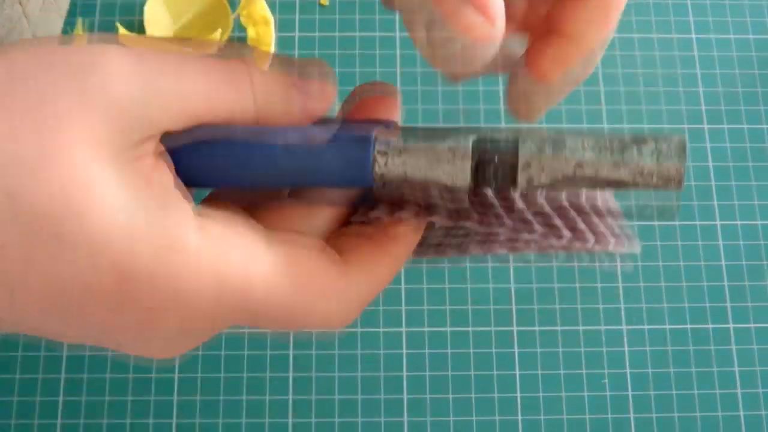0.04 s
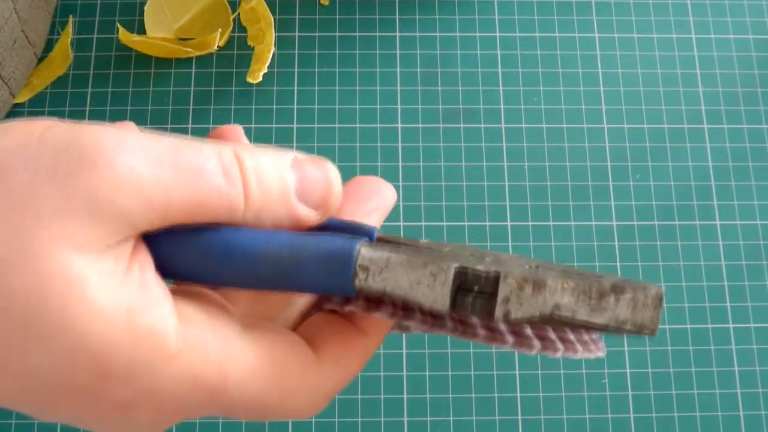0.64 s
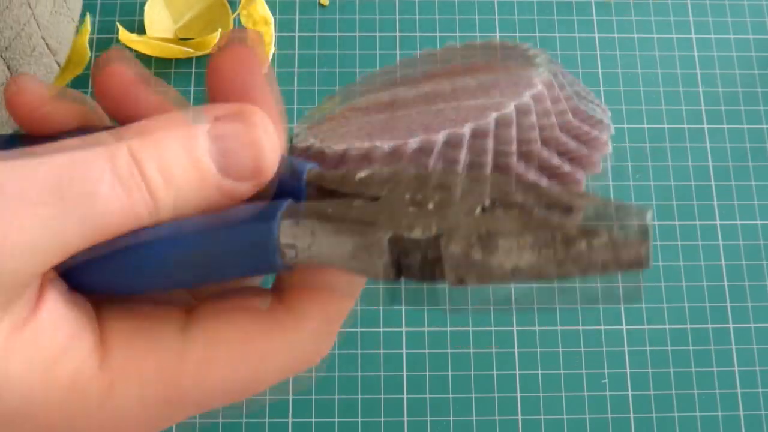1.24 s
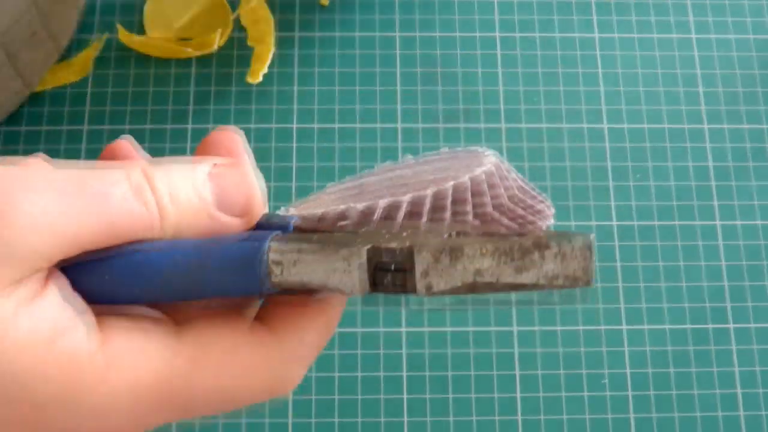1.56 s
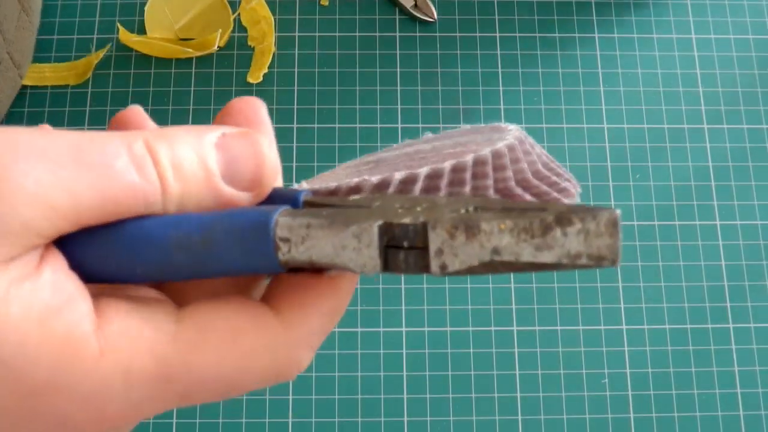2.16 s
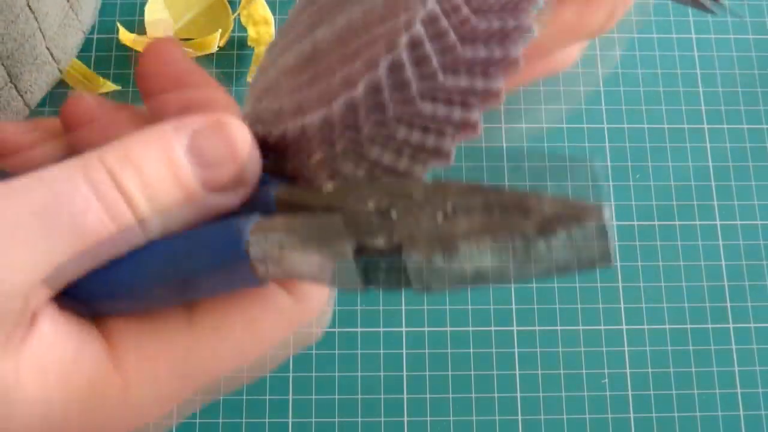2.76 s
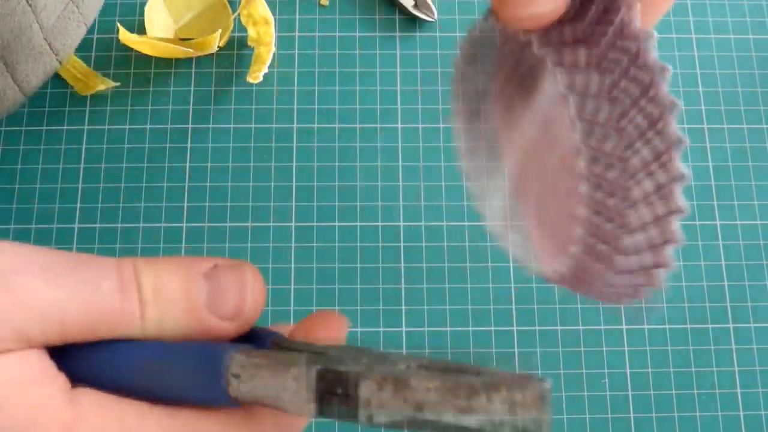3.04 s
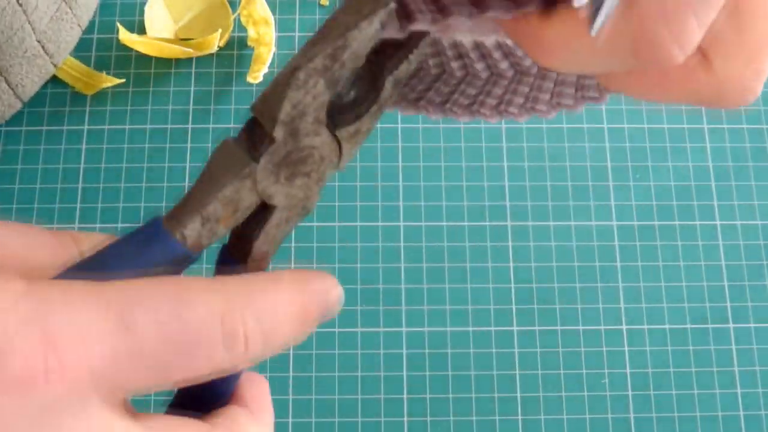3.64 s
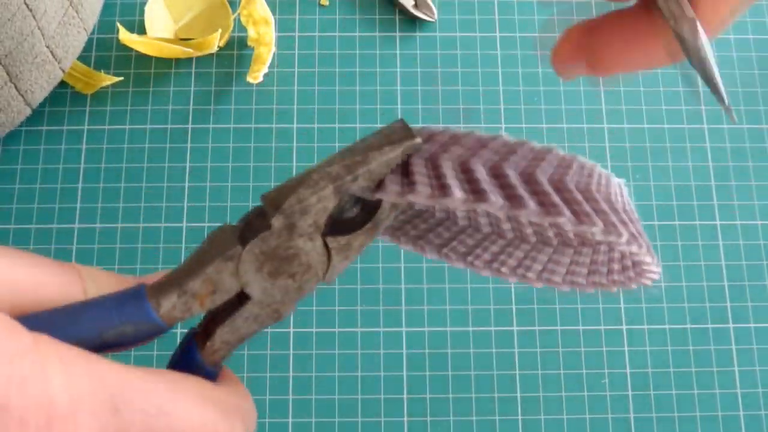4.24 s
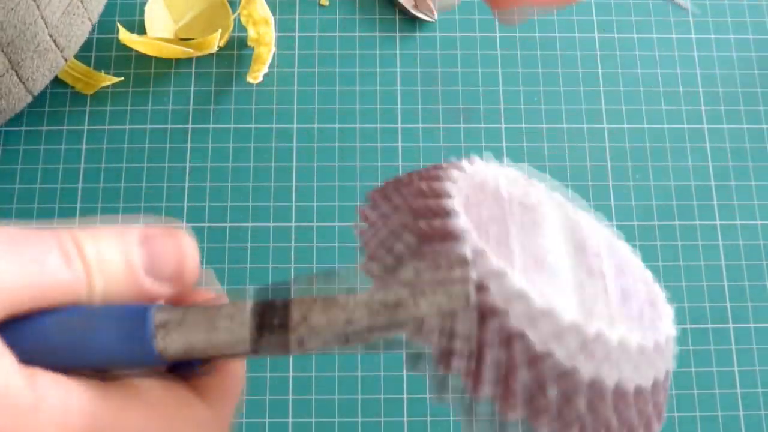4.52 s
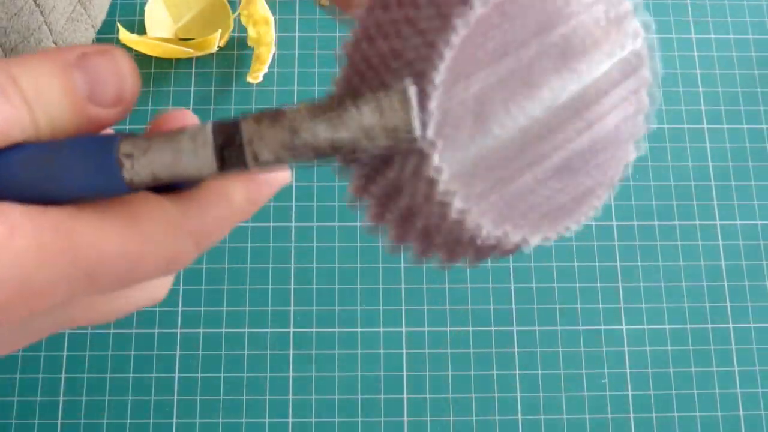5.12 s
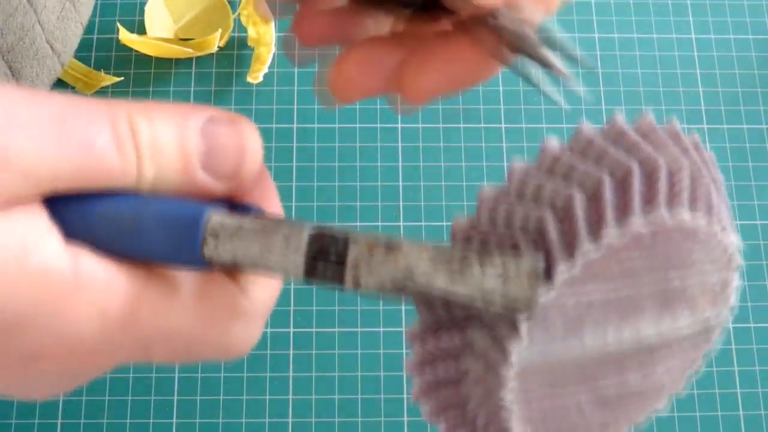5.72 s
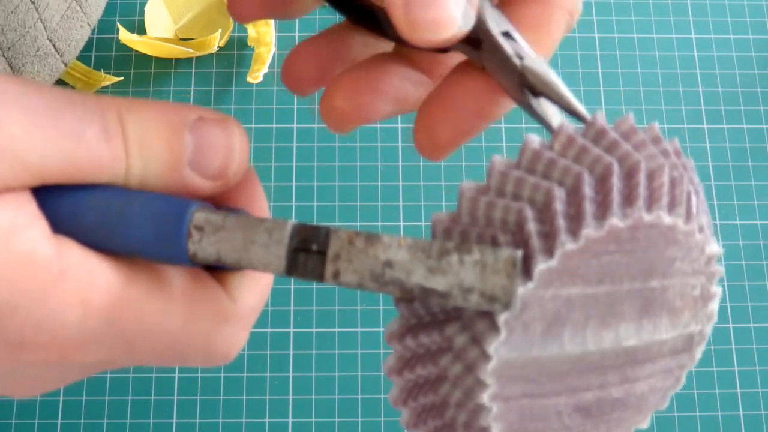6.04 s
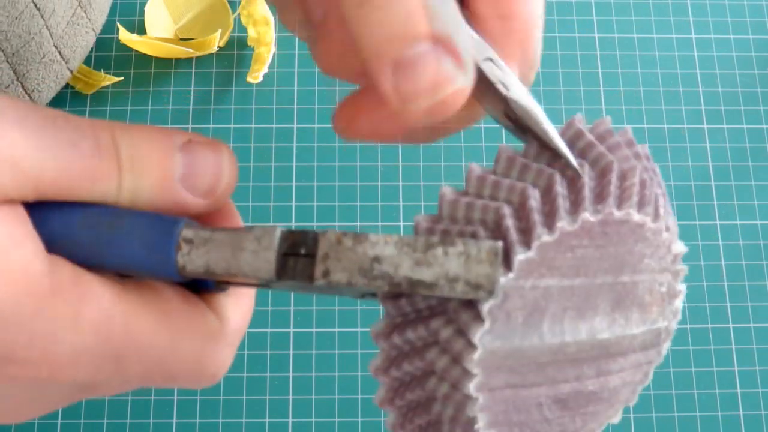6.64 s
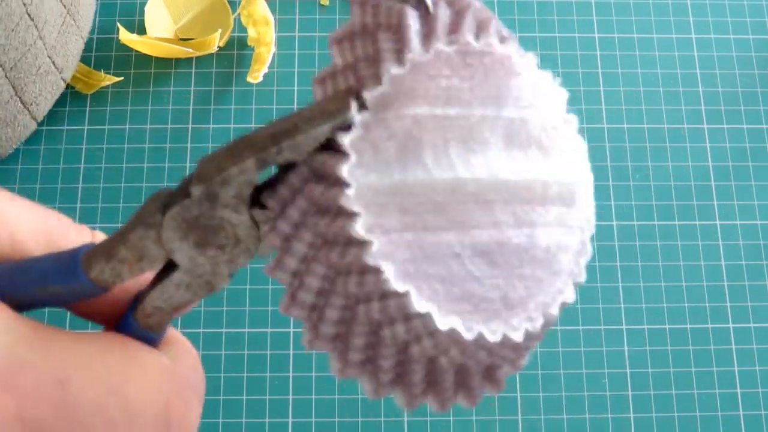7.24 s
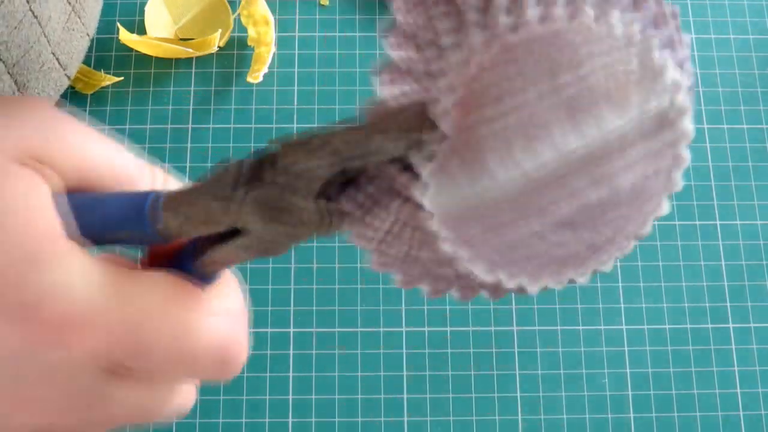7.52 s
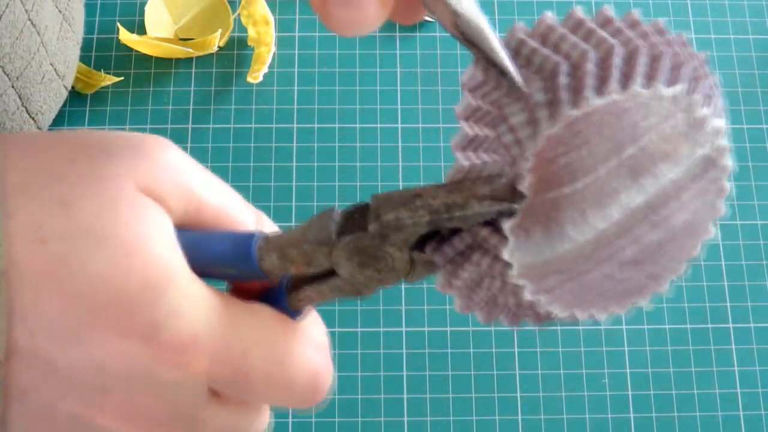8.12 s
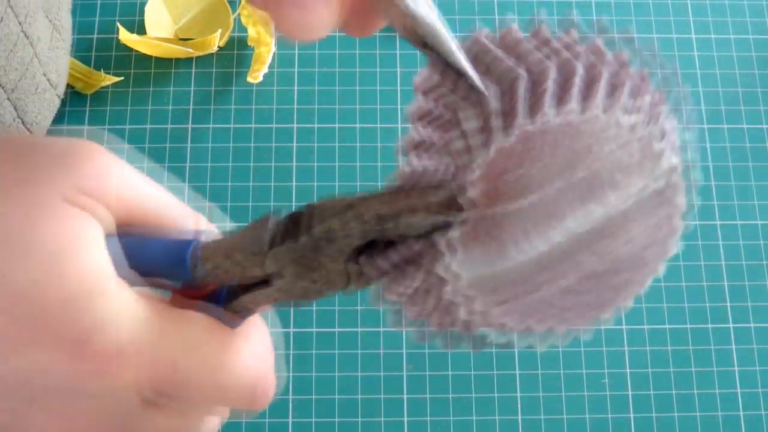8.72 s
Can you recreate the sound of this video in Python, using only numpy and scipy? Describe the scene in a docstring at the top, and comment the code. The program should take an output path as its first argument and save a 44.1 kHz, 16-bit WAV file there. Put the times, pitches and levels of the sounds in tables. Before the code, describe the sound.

Pliers handle a thin pleated plastic pot close to the microphone. First come soft rubs, booming desk bumps and one loud hollow knock, then lighter taps and scrapes. The pot crumples briefly, and after more rubbing the plastic strains and rips with dry ticks and crisp cracks. Behind it a small room hums quietly with a faint rapid tick, dipping briefly after the loudest blows.

```python
"""Pliers grip and twist a thin pleated plastic pot over a desk in a small room.
First the hand bumps the desk, which booms and thuds; jaws and fingers knock and rub the hollow pot.
Near 5 s the pot buckles and crinkles. A low hum swells from 6.4 s and stops at 7.5 s.
From 6.6 s the stretched wall ticks and tears in sharp snaps. Throughout: low room noise, a steady hum
and a faint, quick ticking, all dipping briefly after the loudest blows."""
import sys
import numpy as np
from scipy import signal
from scipy.fft import rfft, irfft, next_fast_len
from scipy.io import wavfile

SR = 44100
rng = np.random.default_rng(int(sys.argv[2]) if len(sys.argv) > 2 else 0)


def unload_wav(signal):
    """Save mono or channel-first audio to the path in sys.argv[1] as 16-bit WAV at rate SR, clipped to [-1, 1]."""
    wavfile.write(
        sys.argv[1],
        SR,
        np.round(np.clip(np.atleast_2d(signal).T, -1, 1) * 32767).astype(np.int16),
    )


N = 386757

# Jaws and fingers knock or buckle the pot. Each row: start in seconds, body, wall and crack levels in dB.
POT_KNOCKS = [(0.0389, -41.5, -52, -44), (0.0606, -61, -63, -52.5), (0.4593, -40, -57, -66),
              (0.5269, -58, -60, -61), (0.8476, -65, -57.5, -61.5), (1.631, -59, -42, -54),
              (1.826, -11, -30, -36.5), (2.2515, -48.5, -55, -58), (2.2724, -37, -54, -59),
              (2.541, -40, -46.5, -50.5), (2.64, -44.5, -57.5, -53.5), (2.6989, -44, -52, -65),
              (2.805, -41, -48, -67), (3.3447, -74, -60, -62), (3.3663, -46.5, -41, -47),
              (3.37, -56, -42.5, -44.5), (3.6054, -47, -46.5, -51.5), (3.655, -40, -49.5, -67),
              (3.7722, -49, -52, -60), (4.941, -39.5, -54.5, -56), (5.015, -26.5, -34.5, -33.5),
              (5.0213, -23.5, -39.5, -59.5), (5.0754, -24.5, -31.5, -29), (5.1236, -38, -36, -40),
              (5.1505, -54, -39.5, -52), (5.2696, -41, -40.5, -44.5), (5.364, -38.5, -47, -44.5),
              (5.9103, -40, -43, -54), (5.9393, -41.5, -51, -72), (6.073, -53, -49.5, -60),
              (6.3676, -39.5, -44.5, -69), (6.4288, -59, -51, -60), (6.4442, -41.5, -46.5, -73)]
# Crisp, bright ticks and snaps of the wall, tearing from 6.6 s.
# Each row: start in seconds, crack level in dB, brightness in dB, body level in dB.
CRISP_SNAPS = [(0.579, -55, 1, -66), (0.62, -58, 1, -60), (0.9981, -48, 7, -67), (1.77, -58, 4, -62),
               (3.0363, -54.5, 0.5, -71), (6.6532, -44.5, -0.5, -47.5), (6.6982, -47.5, 4, -50),
               (6.7086, -30.5, 2.5, -50), (6.8581, -40.5, -0.5, -68), (6.941, -54.5, 2, -66),
               (6.9865, -48.5, -1, -70), (7.03, -43.5, 7, -49), (7.044, -51, 4.5, -69),
               (7.0693, -46, 4.5, -70), (7.1158, -53.5, 1.5, -68.5), (7.213, -54, 4.5, -63.5),
               (7.2304, -41, 10.5, -50), (7.2363, -40.5, -7, -39.5), (7.2921, -49, 2, -63),
               (7.364, -53.5, -0.5, -61.5), (7.3876, -48, 5, -59), (7.3945, -44.5, 1.5, -72),
               (7.404, -36.5, 2, -56), (7.4309, -38.5, -4, -66.5), (7.4393, -50.5, 3.5, -68.5),
               (7.465, -22, -1.5, -60), (7.4868, -52, 2.5, -67.5), (7.5665, -51.5, 1.5, -61.5),
               (7.63, -56.5, -1.5, -80), (8.0118, -59, 8.5, -80), (8.0573, -27.5, 1, -40),
               (8.114, -50.5, 2.5, -56.5), (8.3465, -66, -1, -80), (8.378, -59.5, 6, -74),
               (8.4295, -39.5, -4, -42.5), (8.4348, -36.5, 2.5, -51), (8.6574, -58.5, 12, -86)]
# Radiation of the thin wall. Each row: frequency in Hz, gain in dB.
WALL_RADIATION = [(300, -26.5), (620, -3), (940, 12), (1300, 8.5), (1800, 12.5), (2900, 10.5), (3900, 3),
                  (5700, 9.5), (7400, 10), (10000, 0.5), (15500, 0)]
# Resonances of the pot's body. Each row: frequency in Hz, width in Hz, gain in dB.
POT_MODES = [(303, 100, -3), (442.6, 43.2, 2.5), (600, 130, -10)]
# Ticking of the stretched wall. Each row: start and stop in seconds, ticks per second, base level in dB.
STRAIN_SPELLS = [(5.007, 5.168, 110, -80), (6.654, 6.711, 70, -57.5), (6.858, 7.159, 90, -63),
                 (7.22, 7.311, 140, -57), (7.359, 7.457, 89, -55), (7.496, 8.702, 24, -73)]
# Fingers and jaws slide on the pot. Each row: middle and length in seconds, body and scrape levels in dB.
SLIDE_STROKES = [(0.016, 0.43, -41, -61), (0.596, 0.34, -47, -67), (0.727, 0.53, -48, -68.5),
                 (1.126, 0.48, -52, -66), (1.796, 0.42, -33.5, -63), (2.692, 0.29, -41.5, -65.5),
                 (2.88, 0.1, -44, -55), (3.13, 1, -59.5, -72), (3.25, 0.06, -77, -68),
                 (3.7, 0.49, -50.5, -66), (3.987, 0.086, -51, -57), (4.705, .2, -54, -79),
                 (4.846, 0.083, -48, -61.5), (5.038, 0.14, -32, -54.5), (5.126, 0.072, -36.5, -47.5),
                 (5.183, 0.082, -33.5, -64), (5.256, 0.05, -40.5, -54.5), (5.486, 0.24, -50, -66.5),
                 (6.02, 0.036, -44, -67), (6.063, 0.044, -40, -57), (6.38, 0.054, -39.5, -56),
                 (6.437, 0.066, -39.5, -56), (6.634, 0.5, -54.5, -71.5), (7.27, .1, -66, -67)]
# Spectra of the scraped wall and crinkling pleats. Each row: frequency in Hz, relative density in dB.
SCRAPE_SPECTRUM = [(450, -26.5), (750, 4.5), (1300, 2.5), (2000, 2.5), (2700, -1.5), (3600, -13.5),
                   (5500, -34)]
CRINKLE_SPECTRUM = [(2500, -24), (3500, -2.5), (5500, -2.5), (7300, 2.5), (9000, -11.5), (11000, -15),
                    (16000, -30)]
# The hand bumps the desk. Each row: start in seconds, relative boom and thud levels in dB.
DESK_BUMPS = [(0.46, -30.5, -33), (0.565, -31.5, -37.5), (0.698, -22.5, -33.5), (0.871, -32.5, -49),
              (1.629, -23, -31), (1.737, -20.5, -19.5), (1.834, -20, -19), (1.868, -34, -22.5),
              (2.197, -43, -49.5), (2.286, -22, -38.5)]
# Resonances of the desk. Each row: frequency in Hz, width in Hz, gain in dB.
DESK_MODES = [(189, 12, 5), (264.6, 10, 5.5), (346.5, 14, 1.5), (441, 18.3, 4), (611, 110, -15.5)]
# Decay of the room's tail. Each row: frequency in Hz, T60 in seconds.
ROOM_DECAY = [(150, 0.4), (7000, 0.31), (15000, 0.26)]
# Colour of the room's tail. Each row: frequency in Hz, gain in dB.
ROOM_COLOUR = [(500, -11), (2000, -9), (4000, -12.5), (7300, -9.5), (10500, -15.5), (16000, -12.5)]
# Swell of a low hum near 210 Hz. Each row: time in seconds, level in dB.
HUM_SWELL = [(6.4, -89), (6.75, -60.5), (7.43, -52), (7.5, -92)]
# Room noise. Each row: frequency in Hz, relative density in dB.
AIR_SPECTRUM = [(15, -37), (25, -6.5), (50, -0.5), (123, -3), (166, -2.5), (344, -7.5), (451, -11.5),
                (988, -26.5), (1290, -32.5), (2110, -35), (3340, -43.5), (7310, -41), (11600, -52.5),
                (16000, -42.5)]
# Steady hum. Each row: frequency in Hz, relative level in dB.
HUM_TONES = [(118.4, -59), (209.9, -63.5), (1599, -87)]
# Background ticks that stand out. Each row: start in seconds, relative level in dB.
CLEAR_TICKS = [(0.184, -49), (0.316, -49.5), (0.385, -50), (1.384, -54), (1.517, -55), (1.584, -56),
               (4.386, -52)]
# Resonances of a background tick. Each row: frequency in Hz, width in Hz, gain in dB.
TICK_MODES = [(965, 70, -5), (1900, 28, -7.5), (2400, 200, -9)]
# Dips of the background. Each row: start in seconds, depth in dB.
BACKGROUND_DIPS = [(1.8, 8.5), (7.47, 13), (8.06, 5.5)]


def snaps():
    """Each snap cracks through the wall in its own colour and pops the pot's hollow body."""
    out, t = np.zeros((2, N)), np.arange(SR // 15) / SR
    pop = unit(band(np.sin(2 * np.pi * 350 * t) * decay(t, t60_s=.009), 170, 550))
    for start_s, body_db, wall_db, crack_db, top_db in snap_levels():
        push = fracture(t)
        flex_db = np.clip(.58 * (wall_db + 35), 0, 5)  # hard snaps flex the whole wall
        colour = [(950, wall_db + flex_db), (1300, wall_db), (2500, wall_db),
                  (4200, crack_db), (8200, crack_db), (10800, top_db)]
        # each pleat has its own resonances
        pleat = np.transpose([np.geomspace(700, 16000, 20), 1.6 * rng.standard_normal(20)])
        crack = minimum_phase(packed(push, .0031),
                              lambda hz: along(colour, hz) + along(WALL_RADIATION, hz) + along(pleat, hz))
        body = pop + .34 * unit(band(resonate(push.mean(0), POT_MODES), 150, 640))
        add(out, start_s, crack + amp(body_db) * packed(body, .0047))
    return out


def snap_levels(firm_db=-44, top_db_per_db=.65):
    """Start and band levels: harder knocks are brighter; brighter crisp snaps move the wall less."""
    knocks = [(start_s, body, wall, crack, crack - 20.5 + top_db_per_db * (max(body, crack) - firm_db))
              for start_s, body, wall, crack in POT_KNOCKS]
    crisp = [(start_s, body, crack - 5 - bright, crack, crack - 2 + bright)
             for start_s, crack, bright, body in CRISP_SNAPS]
    return knocks + crisp


def fracture(t, travel_s=.0005917, echo_gain=.16, echo_s=.00105):
    """A sharp release, a brief flutter of the sheet, and their reflection off the desk."""
    hz = np.fft.rfftfreq(len(t), 1 / SR)
    # dispersive bending waves: highs leave first, slightly differently per channel
    delay_1khz_s = travel_s * rng.uniform(.68, 1.315) * (1 + .039 * rng.standard_normal((2, 1)))
    chirp = irfft(np.exp(-4j * np.pi * delay_1khz_s * np.sqrt(1000 * hz)), len(t))
    release = packed(chirp * decay(t, t60_s=.03), 1)
    flutter = packed(stereo_noise(len(t), side_db=-13) * decay(t, t60_s=.016), .78)
    direct = release + amp(2.5) * flutter
    lag = round(SR * echo_s * rng.uniform(.88, 1.12))
    return direct + echo_gain * np.pad(direct, ((0, 0), (lag, 0)))[:, :len(t)]


def recoil(relative_db=-16.5):
    """Each crisp snap jerks the pot in the grip: one short, low push."""
    out, t = np.zeros((2, N)), np.arange(SR // 15) / SR
    push = packed(band(decay(t, t60_s=.01), 55, 190), .005)
    for start_s, crack_db, *_ in CRISP_SNAPS:
        add(out, start_s, amp(crack_db + relative_db) * push)
    return out


def strain():
    """The stretched wall gives way in tiny, dry ticks."""
    out, t = np.zeros((2, N)), np.arange(SR // 100) / SR
    for start_s, stop_s, rate_hz, base_db in STRAIN_SPELLS:
        length_s = stop_s - start_s
        count = max(1, round(rate_hz * length_s))
        for position, weakness, pitch in rng.random((count, 3)):
            burst = stereo_noise(len(t), side_db=-5) * decay(t, t60_s=.003)
            tick = packed(band(burst, 1200 * 3 ** pitch, 13000, order=1), .005)
            add(out, start_s + position * length_s, amp(base_db - 4 * np.log(weakness + .04)) * tick)
    return out


def rubbing():
    """Sliding contact hums in the pot's body, scrapes its wall and crinkles the pleats."""
    body_gain, scrape_gain = stroke_gains()
    body = unit(band(resonate(friction(side_db=-17.5), POT_MODES), 200, 920))
    scrape = coloured(friction(side_db=-3.5), SCRAPE_SPECTRUM)
    crinkle = coloured(friction(side_db=.5), CRINKLE_SPECTRUM)
    return amp(-4.5) * body_gain * body + scrape_gain * (scrape + amp(-4) * crinkle)


def stroke_gains(grip_db=-80.5, edge_drop_db=16.5):
    """Body and scrape gains: each stroke swells and fades over the faint rub of the resting grip."""
    t = np.arange(0, N / SR, .002)
    body = scrape = amp(grip_db)
    for middle_s, length_s, body_db, scrape_db in SLIDE_STROKES:
        swell_db = -edge_drop_db * (2 * (t - middle_s) / length_s) ** 2
        body = np.hypot(body, amp(body_db + swell_db))
        scrape = np.hypot(scrape, amp(scrape_db + swell_db))
    return curves(np.transpose([t, body, scrape]))


def friction(side_db, slips_per_s=280, slip_decay_s=.0015):
    """Tiny slips of differing size merge into a grainy swish."""
    slips = (rng.random(N) < slips_per_s / SR) * amp(4 * np.minimum(rng.exponential(size=N), 3))
    envelope = signal.lfilter([1], [1, -np.exp(-1 / (slip_decay_s * SR))], slips)
    return stereo_noise(N, side_db) * (unit(envelope) + .65)


def desk_bumps(thud_t60_s=.17):
    """A bump shakes the desk's resonances, rattles faintly and sets two low modes booming."""
    out, t = np.zeros((2, N)), np.arange(3 * SR // 4) / SR
    span_s = thud_t60_s / 8
    for start_s, boom_db, thud_db in rebounds():
        chatter = rng.standard_normal(len(t)) * decay(t, thud_t60_s)
        ring = packed(band(resonate(chatter, DESK_MODES), 140, 668, order=4), span_s)
        knock = packed(band(chatter, 107, 478, order=4), span_s)
        rattle = packed(band(chatter, 600, 1610), span_s)
        thud = .46 * ring + .68 * knock + amp(-23.5) * rattle
        short_mode = np.sin(2 * np.pi * 94 * t) * decay(t, t60_s=.053)
        long_mode = np.sin(2 * np.pi * 127 * t + rng.uniform(0, 2 * np.pi)) * decay(t, t60_s=.36)
        attack = 1 - np.exp(-t / .0043)
        boom = band((short_mode + .42 * long_mode) * attack, 53, 230)
        add(out, start_s, amp(boom_db + 3.5) * boom + amp(thud_db) * thud)
    return out


def rebounds(hits=3, gap_s=.025, loss_db=6):
    """Start and levels of each bump and its weaker, unevenly timed rebounds."""
    all_gaps_s = gap_s * rng.uniform(.7, 1.3, (len(DESK_BUMPS), hits))
    return [(start_s + gaps_s[:k].sum(), boom_db - k * loss_db, thud_db - k * loss_db)
            for (start_s, boom_db, thud_db), gaps_s in zip(DESK_BUMPS, all_gaps_s) for k in range(hits)]


def snap_reverb(draws=2):
    """Smooth, diffuse room tail of the snaps, averaged over several random draws."""
    return sum(room(snaps()) for _ in range(draws)) / np.sqrt(draws)


def room(x, predelay_s=.004):
    """A diffuse tail whose treble dies first; it changes as the pot is moved about."""
    out, hop = np.zeros((2, N)), SR // 3
    for start in range(0, N, hop):
        hz, t, noise = signal.stft(stereo_noise(SR // 2, side_db=-5.5), SR, nperseg=256)
        t60_s = along(ROOM_DECAY, hz)[:, None]
        tail = signal.istft(noise * decay(t, t60_s) / np.sqrt(t60_s), SR, nperseg=256)[1]
        tail /= np.linalg.norm(tail[0])
        add(out, start / SR + predelay_s, signal.fftconvolve(x[:, start:start + hop], tail, axes=1))
    return filtered(out, lambda hz: amp(along(ROOM_COLOUR, hz)))


def hum_swell():
    """A low hum near 210 Hz swells from 6.4 s and stops at 7.5 s."""
    return amp(curves(HUM_SWELL)[0]) * unit(band(rng.standard_normal(N), 195, 230))


def background():
    """Low room noise, hum and ticking, dipping together."""
    t = np.arange(N) / SR
    air = coloured(stereo_noise(N, side_db=-8), AIR_SPECTRUM)
    hum = sum(amp(db) * np.sqrt(2) * np.sin(2 * np.pi * hz * t + rng.uniform(0, 2 * np.pi))
              for hz, db in HUM_TONES)
    return amp(background_gain_db()) * (amp(-52.5) * air + hum + ticking())


def ticking(rate_hz=15):
    """Faint ticks on a steady beat, as from a focus motor; a few stand out."""
    out, t = np.zeros((2, N)), np.arange(SR // 20) / SR
    beat = [(start_s, -71 + 3 * rng.normal()) for start_s in np.arange(.053, N / SR, 1 / rate_hz)]
    clear = [(start_s, db - 10) for start_s, db in CLEAR_TICKS]
    for start_s, db in beat + clear:
        step = rng.standard_normal(len(t)) * decay(t, t60_s=.028)
        tick = band(resonate(step, TICK_MODES), 700, 1800)
        add(out, start_s, amp(db) * packed(tick, .016))
    return out


def background_gain_db(rest_db=-1.5, attack_s=.03, hold_s=.35, recovery_db_per_s=27.5):
    """At each listed dip the level drops quickly, holds and creeps back."""
    t, gain_db = np.arange(N) / SR, rest_db
    for start_s, depth_db in BACKGROUND_DIPS:
        onset = np.clip((t - start_s) / attack_s, 0, 1)
        drop_db = np.clip(depth_db - recovery_db_per_s * (t - start_s - hold_s), 0, depth_db)
        gain_db = gain_db - onset * drop_db
    return gain_db


def amp(db):
    """Decibels to gain."""
    return 10 ** (np.asarray(db) / 20)


def decay(t, t60_s):
    """Envelope falling 60 dB in t60_s."""
    return amp(-60 * t / t60_s)


def unit(x):
    """Scale to rms 1."""
    return x / np.sqrt(np.mean(x ** 2) + 1e-20)


def packed(x, span_s):
    """Scale to the energy of rms 1 over span_s."""
    return unit(x) * np.sqrt(span_s * SR / x.shape[-1])


def along(points, hz):
    """Interpolate (Hz, value) points on a log axis."""
    points_hz, values = np.transpose(points)
    return np.interp(np.log(hz + 1), np.log(points_hz + 1), values)


def curves(rows):
    """One value per sample for each column after the time."""
    times_s, *columns = np.transpose(rows)
    return [np.interp(np.arange(N) / SR, times_s, column) for column in columns]


def filtered(x, response):
    """Apply a complex frequency response."""
    n = x.shape[-1]
    size = next_fast_len(n + 8192)
    return irfft(rfft(x, size) * response(np.fft.rfftfreq(size, 1 / SR)), size)[..., :n]


def coloured(x, spectrum):
    """Shape by (Hz, dB) points, at rms 1."""
    return unit(filtered(x, lambda hz: amp(along(spectrum, hz))))


def resonate(x, modes):
    """Parallel resonances of alternating sign."""
    return filtered(x, lambda hz: sum(
        (-1) ** k * amp(db) * 1j * hz * width_hz / (mode_hz ** 2 - hz ** 2 + 1j * hz * width_hz)
        for k, (mode_hz, width_hz, db) in enumerate(modes)))


def band(x, lo_hz, hi_hz, order=2):
    """Causal band-pass."""
    return signal.sosfilt(signal.butter(order, [lo_hz, hi_hz], "band", fs=SR, output="sos"), x)


def minimum_phase(x, gain_db):
    """Apply a gain curve of frequency, with nothing ahead of the attack."""
    n = 2 * x.shape[-1]
    gain = amp(np.maximum(gain_db(np.fft.rfftfreq(n, 1 / SR)), -120))
    cepstrum = irfft(np.log(gain), n)
    cepstrum[1:n // 2] *= 2
    cepstrum[n // 2 + 1:] = 0
    return irfft(rfft(x, n) * np.exp(rfft(cepstrum)), n)[..., :n // 2]


def stereo_noise(n, side_db):
    """White noise: a shared part plus an opposed part at side_db."""
    mid, side = rng.standard_normal((2, n))
    return unit(np.array([mid + amp(side_db) * side, mid - amp(side_db) * side]))


def add(track, start_s, sound):
    """Mix a sound into the track."""
    start = max(0, round(start_s * SR))
    part = track[:, start:start + sound.shape[-1]]
    part += sound[..., :part.shape[1]]


def scene():
    """Pot and desk in the room; the tail dips partly with the background."""
    direct = recoil() + desk_bumps() + strain() + hum_swell()
    tail = amp(.25 * background_gain_db()) * (snap_reverb() + room(direct))
    return snaps() + direct + tail + rubbing() + background()


def record(dry):
    """The camera's band limit: a steep low-pass."""
    cutoff_hz = 16300
    return filtered(dry, lambda hz: 1 / np.sqrt(1 + (hz / cutoff_hz) ** 120))


dry = scene()
out = record(dry)
unload_wav(out)
```